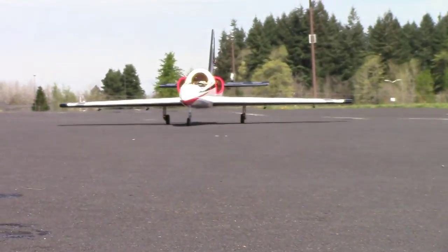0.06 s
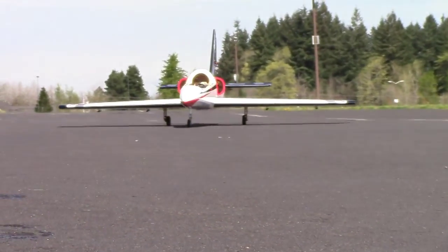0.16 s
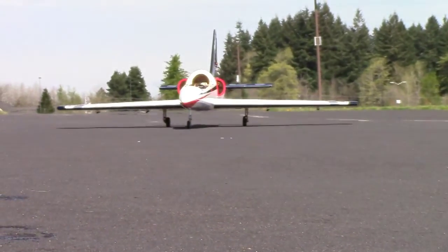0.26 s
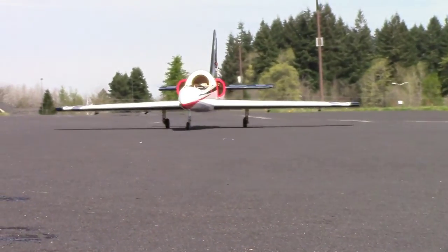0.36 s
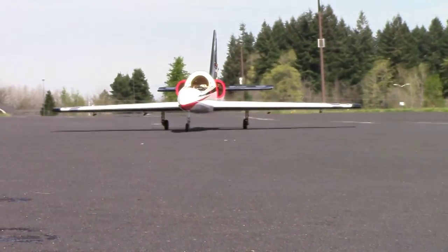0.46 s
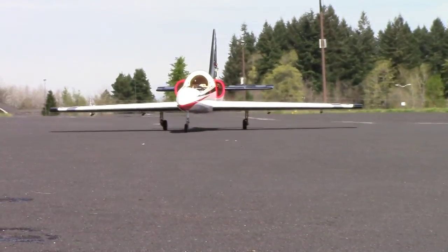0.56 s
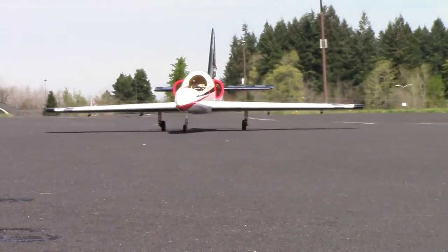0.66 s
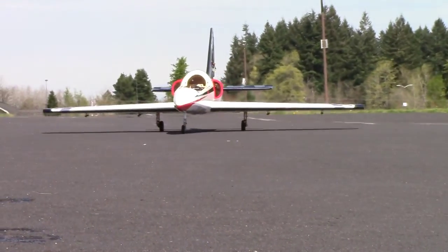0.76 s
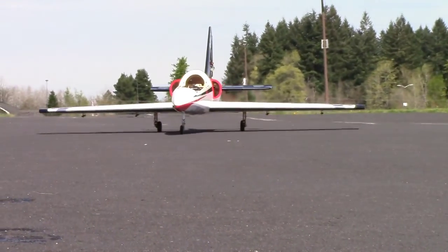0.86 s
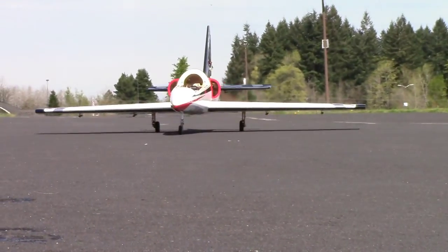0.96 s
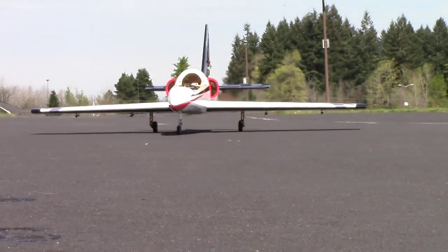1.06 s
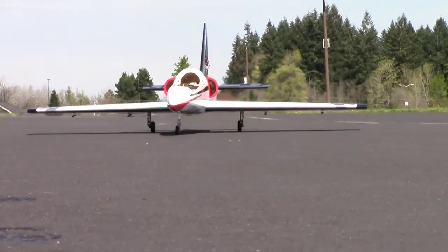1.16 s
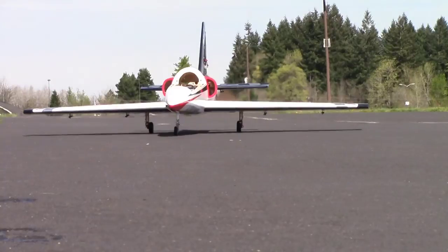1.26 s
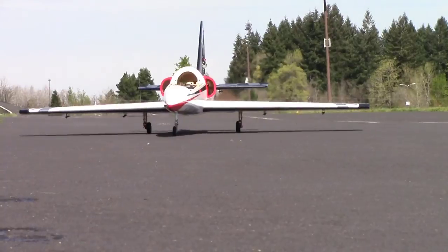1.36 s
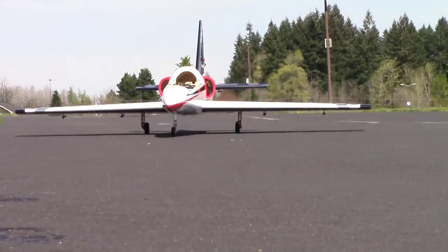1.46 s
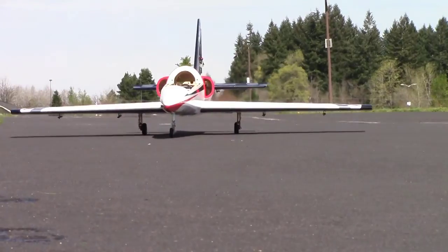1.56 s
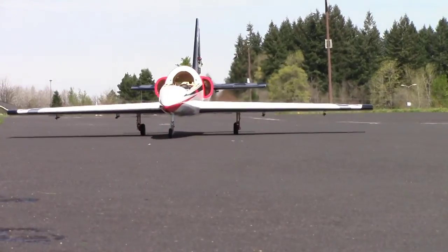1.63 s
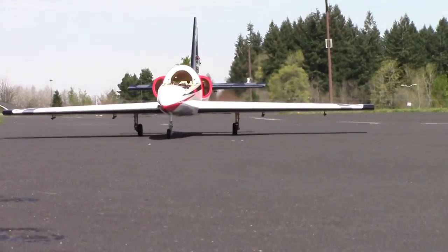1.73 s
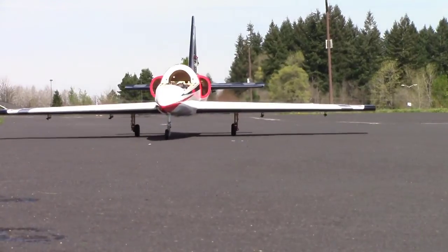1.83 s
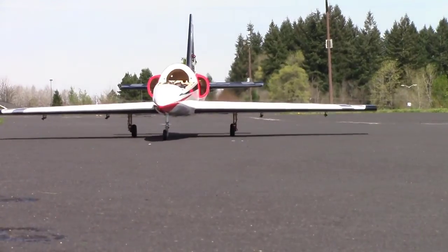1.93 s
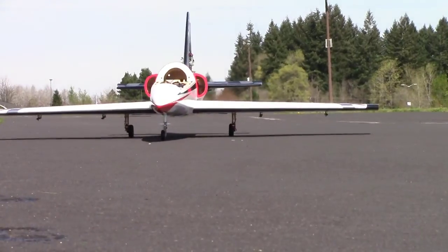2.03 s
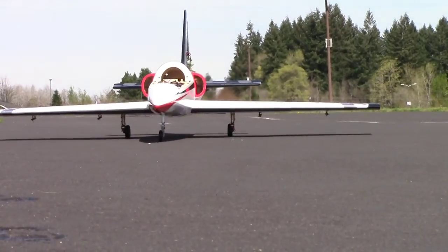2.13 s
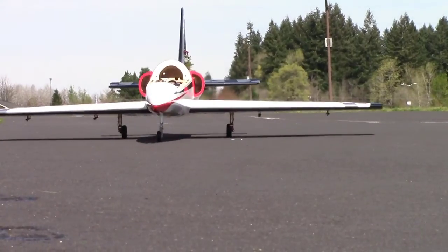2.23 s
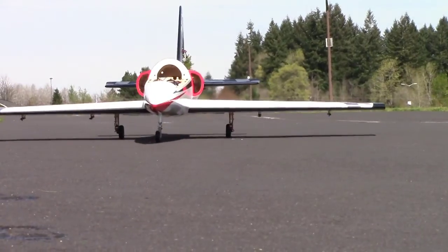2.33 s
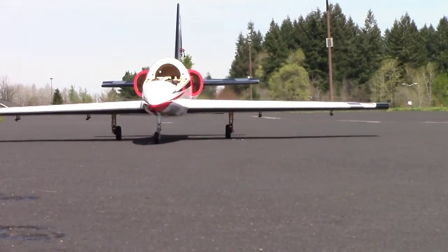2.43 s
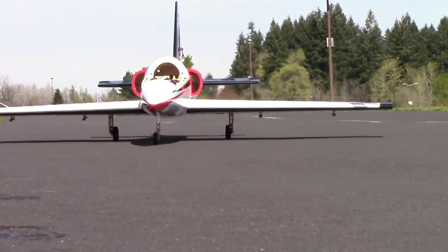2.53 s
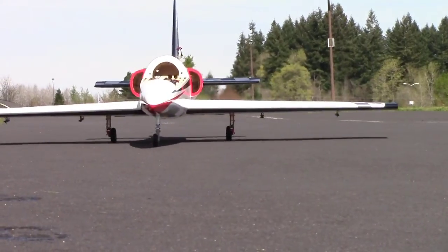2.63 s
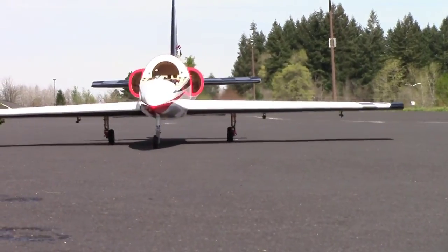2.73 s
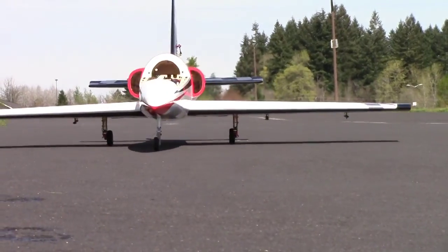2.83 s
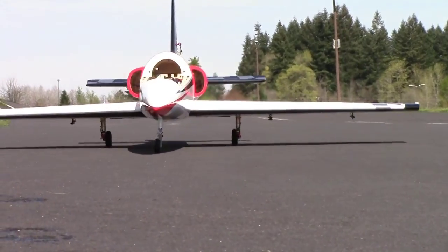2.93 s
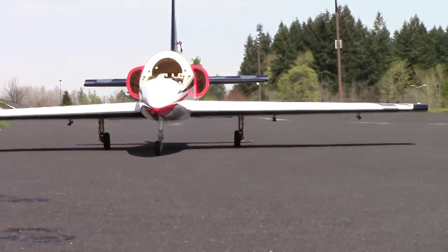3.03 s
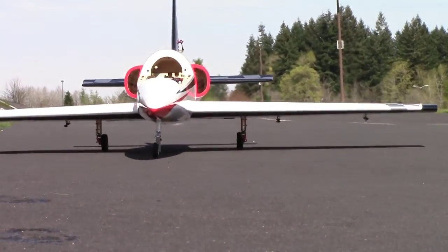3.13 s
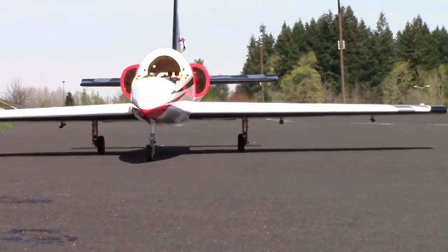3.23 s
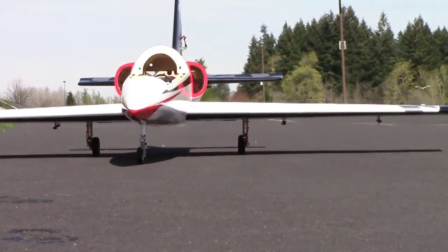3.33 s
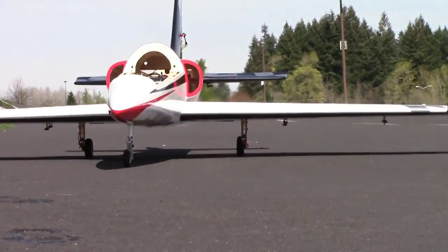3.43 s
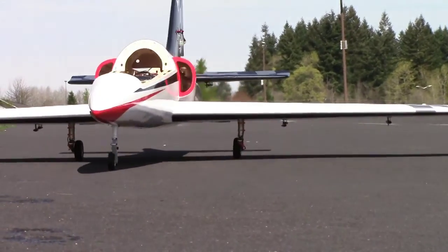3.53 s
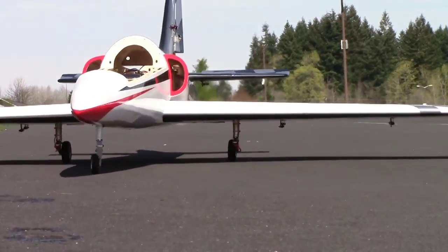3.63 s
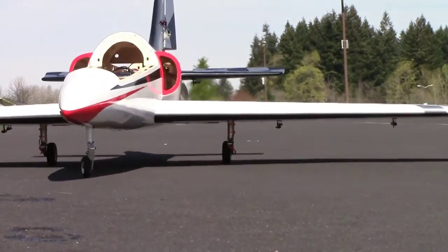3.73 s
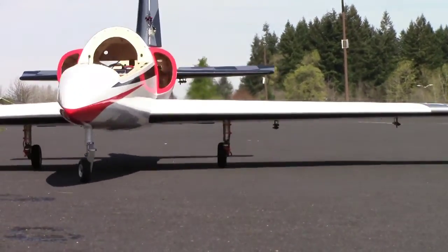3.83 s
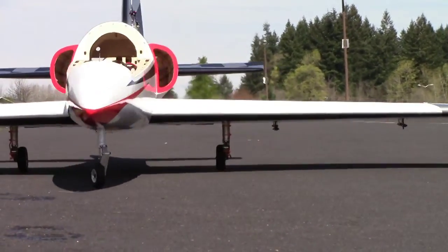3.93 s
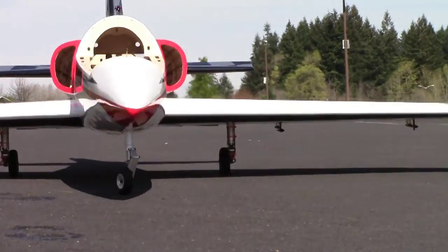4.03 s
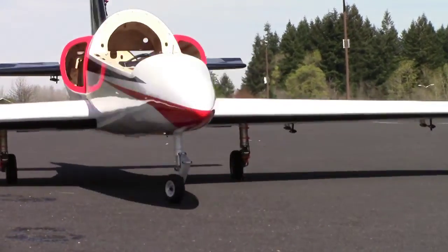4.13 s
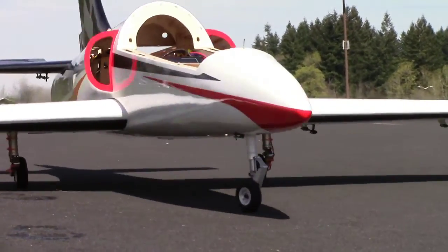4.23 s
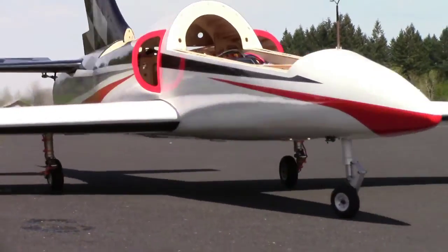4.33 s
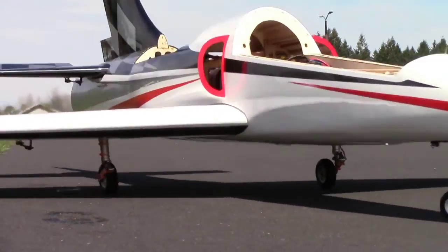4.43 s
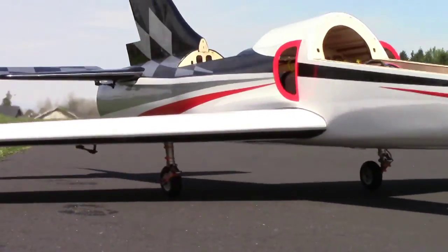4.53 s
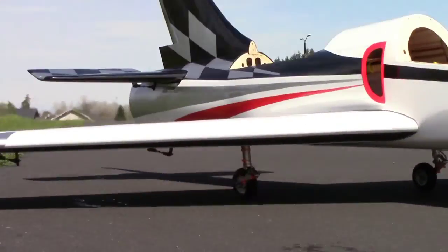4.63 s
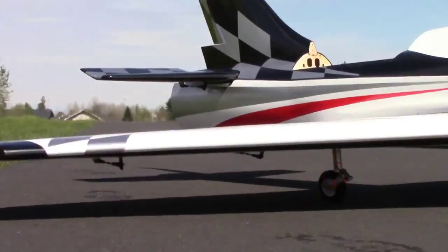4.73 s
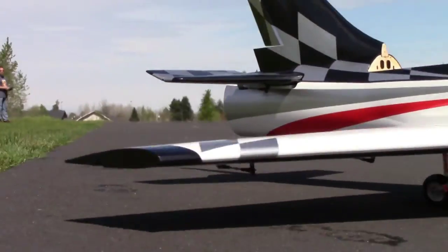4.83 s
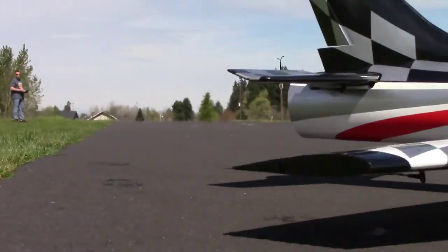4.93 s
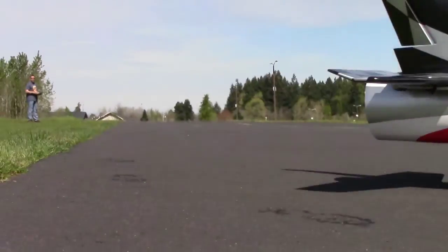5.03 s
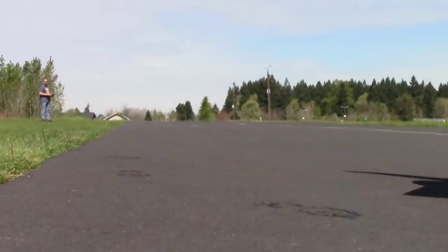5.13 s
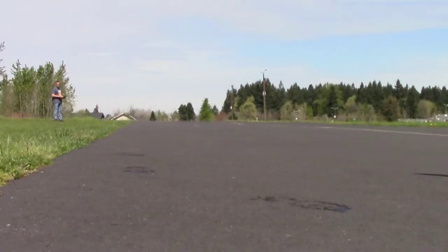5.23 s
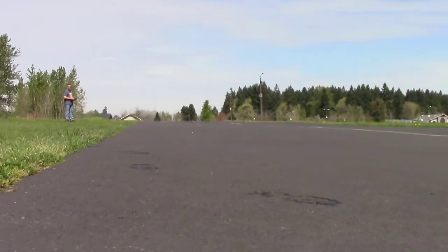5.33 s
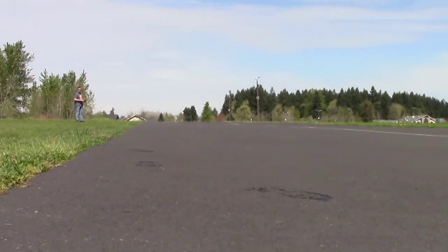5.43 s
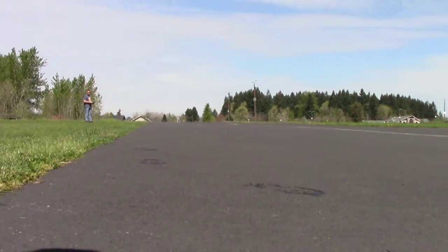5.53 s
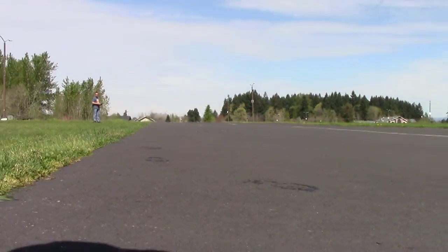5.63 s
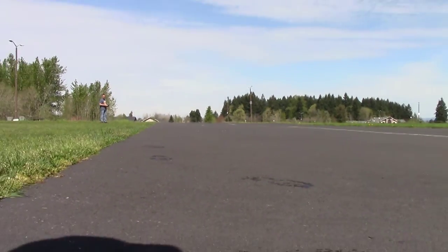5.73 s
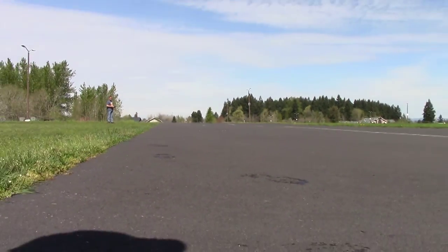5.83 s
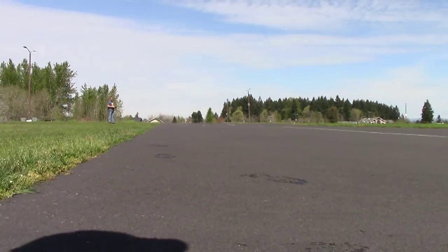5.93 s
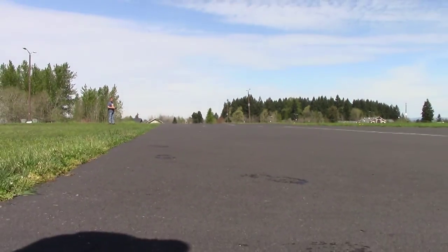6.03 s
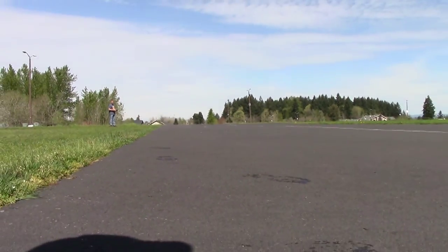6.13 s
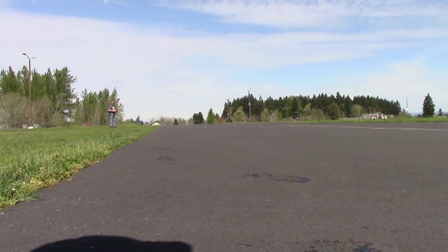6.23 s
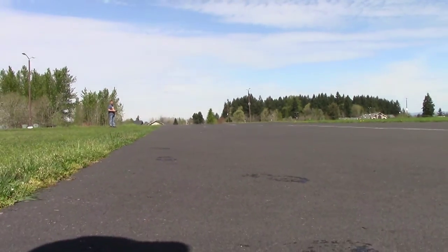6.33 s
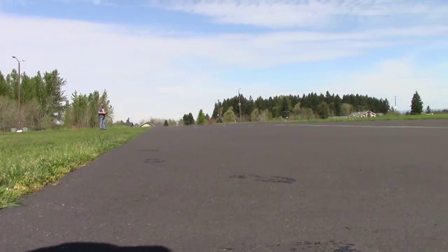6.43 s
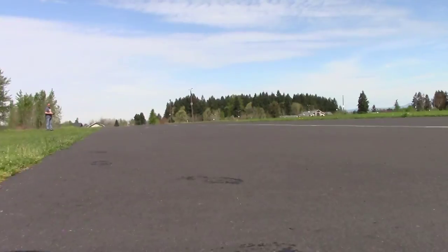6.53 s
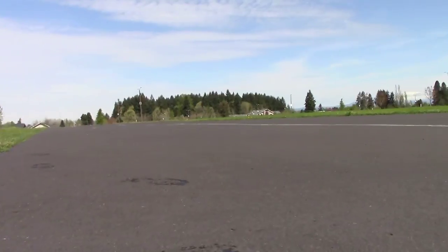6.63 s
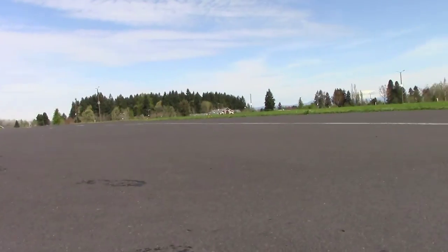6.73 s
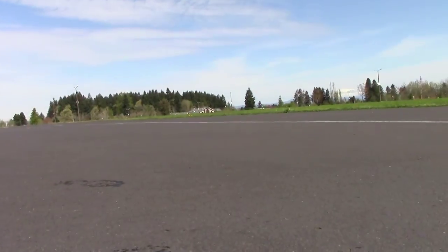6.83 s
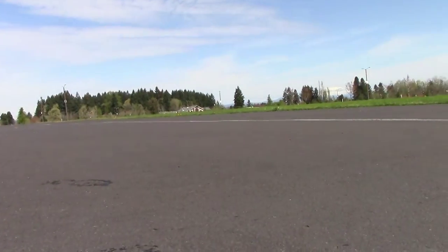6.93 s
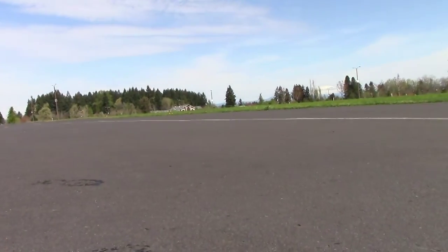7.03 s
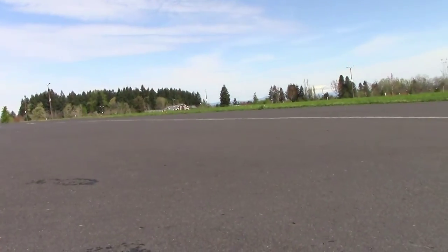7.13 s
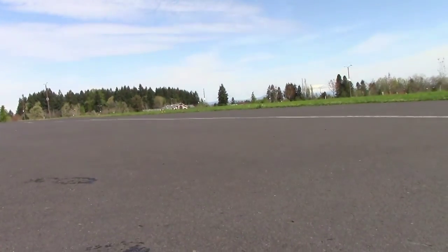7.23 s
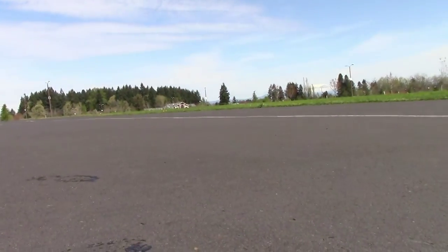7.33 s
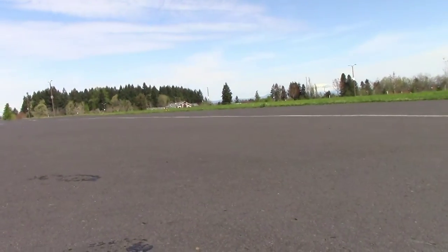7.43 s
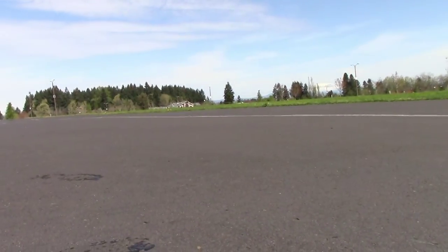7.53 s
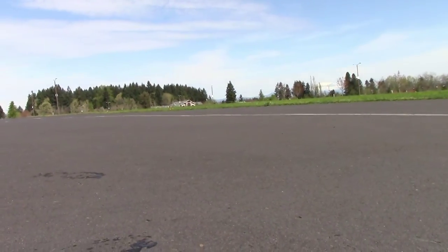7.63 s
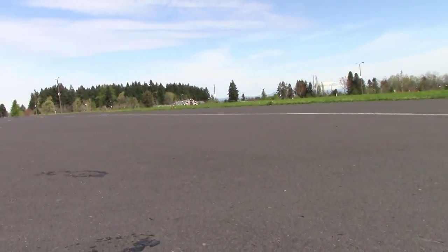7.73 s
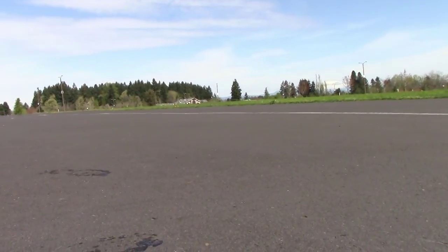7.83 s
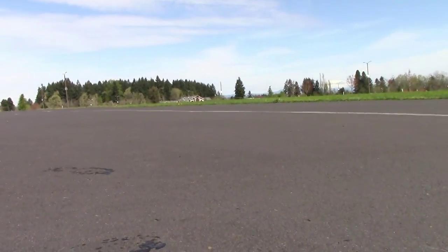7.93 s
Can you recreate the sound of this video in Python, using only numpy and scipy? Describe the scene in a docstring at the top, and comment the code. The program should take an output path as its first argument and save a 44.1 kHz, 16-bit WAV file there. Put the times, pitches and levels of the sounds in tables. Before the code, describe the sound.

Shrill turbine whine climbs and flares over a hissing roar, passes close by, turns to hollow exhaust rumble, and falls in pitch.

```python
"""The small turbine engine of a model jet spools up from idle, holds, and winds down as the jet taxis up,
passes close by and rolls away with its tail to the listener. Tones locked to the shaft make the blade whistle;
shaped noise makes the roar of the gas. The nose gives a ringing intake duct and its hiss,
the rear gives the tailpipe and the jet. A faint low hum lies underneath, and two close microphones hear it all."""
import sys
import numpy as np
from scipy import signal
from scipy.io import wavfile
from scipy.ndimage import uniform_filter1d, minimum_filter1d

SR = 44100
rng = np.random.default_rng(int(sys.argv[2]) if len(sys.argv) > 2 else 0)


def put_to_file(sound):
    """Save the sound as 16-bit audio at rate SR, in the file named by the first command-line argument."""
    columns = np.atleast_2d(sound).T  # one column per channel
    safe = np.clip(columns, -1, 1)
    whole_steps = np.round(safe * 32767)
    wavfile.write(sys.argv[1], SR, whole_steps.astype(np.int16))


N = 351477
FRAME, HOP = 2048, 256  # spectral frame and step [samples]

# side of the aircraft facing the listener: (time [s], aspect [0 nose, 1 flank, 2 tail; held at 2 beyond])
ASPECT = [(0, 0.042), (4.1, 0), (4.5, 0.11), (4.85, 0.78), (5.15, 0.91), (5.6, 0.95), (6.1, 1.7),
          (6.6, 1.84), (7.3, 2.16), (7.97, 1.95)]


def gain_of(db):
    """Decibels to amplitude gain."""
    return 10 ** (np.asarray(db) / 20)


def follow(rows, t):
    """Every column of a time curve, joined by straight lines, at the times t."""
    times, *columns = np.transpose(rows)
    return np.array([np.interp(t, times, column) for column in columns])


def read(rows, hz):
    """Every column of a spectrum, interpolated along log frequency, at the frequencies hz."""
    row_hz, *columns = np.transpose(rows)
    return np.array([np.interp(np.log(hz + 1), np.log(row_hz + 1), column) for column in columns])


def bump(x, centre, width):
    """A bell of height 1, half as high at the ends of its width."""
    return .5 ** ((2 * (x - centre) / width) ** 2)


def wander(rate_hz):
    """Complex noise of power 1 that changes about rate_hz times a second."""
    step = 32  # samples between the slow noise points
    real, imaginary = rng.standard_normal((2, N // step + 2))
    hz = np.fft.fftfreq(len(real), step / SR)
    slow = np.fft.ifft((real + 1j * imaginary) / (1 + (hz / rate_hz) ** 2))
    slow = slow / np.sqrt(np.mean(abs(slow) ** 2))
    return np.interp(np.linspace(0, len(slow) - 1, N), np.arange(len(slow)), slow)


def shaft_speed(t):
    """Turns per second at the times t: inertia bends the heavy rotor's speed into a smooth cubic curve."""
    # throttle up, hold, throttle down: (time [s], shaft speed before waver [turns/s])
    shaft = [(0.0, 624.4), (0.08, 623.1), (1.49, 842.3), (2.09, 937.8), (2.35, 957.2), (2.44, 963.2),
             (3.7, 994.9), (3.8, 994.3), (4.01, 984.0), (4.89, 959.9), (5.25, 953.4), (5.8, 936.4),
             (5.92, 923.5), (6.08, 902.5), (6.58, 788.5), (7.08, 688.6), (7.39, 652.7), (7.97, 606.9)]
    knots, knot_hz = np.transpose(shaft)

    def terms(at):
        """Cubic spline terms plus a straight line."""
        return np.c_[abs(at[:, None] - knots) ** 3, at, np.ones(len(at))]

    # the last two equations keep the ends of the curve straight
    ends = np.c_[[knots, np.ones(len(knots))], np.zeros((2, 2))]
    weights = np.linalg.solve(np.r_[terms(knots), ends], np.r_[knot_hz, 0, 0])
    grid = np.linspace(0, N / SR, N // HOP)
    return np.interp(t, grid, terms(grid) @ weights)


def spool(t):
    """Rotor speed from 0 at its slowest to 1 at full."""
    hz = shaft_speed(t)
    return (hz - hz.min()) / np.ptp(hz)


def whistle_level(t, hz, ahead):
    """The whistle in dB: choked near idle, flaring as its beams sweep by, throbbing during the close pass."""
    # base level as the intakes turn towards the listener and away: (time [s], level [dB])
    whistle_base = [(0.0, -23), (1.37, -8.5), (1.65, -18), (1.91, -20.5), (2.54, -16.0), (2.96, -29),
                    (3.78, -35), (3.9, -20), (4.69, -11.8), (5.11, -33.7), (5.53, -28), (5.64, -48),
                    (6.3, -40), (6.54, -21.5), (7.06, -15.5), (7.29, -32.5), (7.65, -18.5), (7.97, -31)]
    # steering swings a narrow beam over the listener: (time [s], length [s], lift [dB])
    flares = [(0.967, 0.11, 3.5), (1.76, .1, 6), (2.202, .17, 5.5), (3.46, .25, 7.5), (4.16, 0.14, 8),
              (6.784, 0.074, 11.5)]
    flare_db = sum(lift_db * bump(t, s, length) for s, length, lift_db in flares)

    # a whistle this low cannot travel along the duct
    cut_on_hz, cut_on_width_hz = 7610, 23
    choke_ahead_db, choke_behind_db = -26, -7
    choke_db = choke_behind_db + (choke_ahead_db - choke_behind_db) * ahead
    choked = .5 - .5 * np.tanh(.5 * (hz - cut_on_hz) / cut_on_width_hz)

    # the two intakes interfere evenly during the close pass
    pass_s, pass_length_s = 4.47, 0.45
    throb_peak_s, throb_period_s, throb_depth = 4.63, 0.188, 0.78
    far_intake = throb_depth * bump(t, pass_s, pass_length_s)
    throb = abs(1 + far_intake * np.exp(2j * np.pi * (t - throb_peak_s) / throb_period_s))
    return follow(whistle_base, t)[0] + choke_db * choked + flare_db + 20 * np.log10(throb)


def rotor():
    """Tones locked to the shaft; turbulent air makes them flutter and gives each a breathy skirt."""
    # hot exhaust between engine and listener scatters the tones: (time [s], scattered share [0-1])
    scatter_curve = [(0, 0.02), (4.3, .004), (4.7, 0.02), (4.95, 0.6), (5.3, 0.7), (6.3, 0.5), (6.6, 0.42),
                     (6.8, 0.07), (7.97, 0.02)]
    # rotor unbalance, about once a turn: (time [s], level [dB])
    unbalance = [(0, -52), (4.2, -46), (4.6, -27.5), (5.1, -25), (5.5, -29), (6.3, -33), (6.8, -33),
                 (7.1, -35), (7.35, -25), (7.97, -29)]
    # weak orders from unequal blades: (multiple of the shaft, level at idle [dB], level at full speed [dB])
    orders = [(13, -48, -63), (14, -40, -68), (15, -49, -72)]
    # alternating long and short blades, an octave below the whistle: (time [s], level [dB])
    half_tone = [(0.0, -51), (0.32, -49.2), (0.46, -33), (0.95, -45.4), (2.03, -47.5), (3.9, -31),
                 (4.33, -55), (5.09, -34), (5.94, -52), (7.04, -35.1), (7.21, -52), (7.31, -34),
                 (7.97, -54.1)]
    # and a fifth above it: (frequency [Hz], level from ahead [dB], level from behind [dB])
    fifth_tone = [(11200, -43, -43), (12300, -44, -45), (13300, -35, -47), (14800, -39, -50),
                  (15700, -43, -66)]
    blades = 12
    waver_hz, waver_rate_hz = 0.29, 14  # unsteadiness of the shaft speed
    flutter_hz, skirt_hz, skirt_db = 30, 220, -31
    fading, low_fading = 0.06, 0.045  # extra scattered share of weak tones, share of the unbalance

    t = np.arange(N) / SR
    shaft_hz = shaft_speed(t) + waver_hz * wander(waver_rate_hz).real
    angle = 2 * np.pi * np.cumsum(shaft_hz) / SR
    scatter, speed = follow(scatter_curve, t)[0], spool(t)
    weak_share = scatter + fading
    ahead = np.clip(1 - follow(ASPECT, t)[0], 0, 1)

    def tone(order, db, share):
        """One shaft order, part direct and part scattered, silent above half the sample rate."""
        scattered = np.sqrt(share) * wander(flutter_hz)
        air = np.sqrt(1 - share) + scattered + gain_of(skirt_db) * wander(skirt_hz)
        wave = (air * np.exp(1j * order * angle)).real
        return np.sqrt(2) * gain_of(db) * wave * (order * shaft_hz < SR / 2)

    whistle = tone(blades, whistle_level(t, blades * shaft_hz, ahead), scatter)
    whistle = whistle + tone(2 * blades, -48, weak_share)  # faint octave

    fifth = blades + blades / 2
    front_db, back_db = read(fifth_tone, fifth * shaft_hz)
    splitter = tone(blades / 2, follow(half_tone, t)[0], weak_share)
    splitter = splitter + tone(fifth, back_db + (front_db - back_db) * ahead, weak_share)

    buzz = sum(tone(round(order), idle_db + (full_db - idle_db) * speed, weak_share)
               for order, idle_db, full_db in orders)
    shake = tone(0.99, follow(unbalance, t)[0], low_fading)
    # the weak orders leave by the intake only
    return whistle + splitter + ahead * buzz + shake


def gas_colour(t, hz):
    """Spectrum in dB over time: duct resonances from the nose give way to tailpipe resonances from behind."""
    # broad relative colour: (frequency [Hz], nose [dB], flank [dB], tail [dB])
    colour = [(25, -42, -42, -38), (51, -42, -49, -49), (102, -17.5, -14.5, -5), (161, -4.5, -0.5, 2.5),
              (311, -7.5, 0, -13.5), (570, -7.5, 7.5, -7), (1190, -2.5, -4, -10), (2400, -3, -5.5, -13),
              (3270, -11, -6.5, -15), (4920, -17.5, -23, -22), (7070, -16.5, -10.5, -22.5),
              (10500, -10, -20, -22), (12300, -11, -46, -43), (15600, -27, -46, -52)]
    # resonances of intake duct and hollow fuselage: (frequency [Hz], width [Hz], lift or dip [dB])
    duct_modes = [(191, 56, 6), (277, 82, 4.5), (519, 95, 13.5), (634.5, 151, 13.5), (796, 52, -5),
                  (1026, 235, 12), (1278, 91, -5.5), (1400, 197, 9), (1692, 140, 6), (2046, 210, 6.5),
                  (2266, 180, 3), (2520, 120, 0), (2870, 110, 3), (3300, 560, 8), (3860, 230, 4),
                  (6500, 500, 4)]
    # tailpipe resonances: (frequency [Hz], width [Hz], lift from the flank [dB], lift from the tail [dB])
    tailpipe = [(208.5, 67, 9.5, 8), (408, 120, 9, 13), (643, 85, 4, -5), (722, 80, 1.5, 8),
                (1007, 116, 6.5, 3), (1310, 130, 4.5, 3), (1530, 76, -3.5, -3), (1817, 240, -0.5, 4.5),
                (2210, 300, 2.5, -1.5), (2800, 520, 0.5, -2), (3300, 330, 0, -8.5), (3900, 400, 0.5, -0.5)]
    # air sucked through the compressor:
    # (frequency [Hz], width [Hz], lift at idle [dB], lift at full speed [dB])
    suction_band = (8980, 2740, 9.9, 17)
    # breathy intake band that rises with the airflow:
    # (frequency at idle [Hz], frequency at full speed [Hz], width [Hz], lift [dB])
    whoosh_band = (1690, 2350, 250, 4.6)
    # extra fuel while spooling up makes the burner boom: (time [s], lift [dB])
    boom = [(0, 2), (.3, 10), (.8, 14), (1.35, 11.5), (1.55, 4), (2.2, 0.5), (7.97, -20)]
    # burner resonances: (frequency [Hz], width [Hz], share of the boom's lift)
    burner_modes = [(610, 450, 0.42), (989, 306, 0.77), (1320, 110, 0.091), (1535, 380, 0.27)]
    # hot gas bends treble off the jet's axis, moving its brightest pitch:
    # (time [s], frequency [Hz], lift or dip [dB])
    jet_peak = [(5.2, 2500, -21), (5.55, 2960, -3.5), (5.72, 2750, 1), (5.85, 1280, 7), (6.3, 915, 3),
                (6.6, 750, -2), (7.0, 750, -3)]
    jet_width = 0.89  # share of the jet's peak frequency

    speed = spool(t)
    nose, flank, tail = read(colour, hz)
    duct = sum(lift_db * bump(hz, f, width) for f, width, lift_db in duct_modes)
    burner = sum(share * bump(hz, f, width) for f, width, share in burner_modes)
    pipe_flank, pipe_tail = sum(np.outer(dbs, bump(hz, f, width)) for f, width, *dbs in tailpipe)

    suction_hz, suction_width, idle_db, full_db = suction_band
    suction = np.outer(idle_db + (full_db - idle_db) * speed, bump(hz, suction_hz, suction_width))
    idle_hz, full_hz, whoosh_width, whoosh_db = whoosh_band
    whoosh = whoosh_db * bump(hz, idle_hz + (full_hz - idle_hz) * speed[:, None], whoosh_width)

    from_nose = nose + duct + suction + whoosh + np.outer(follow(boom, t)[0], burner)
    views = [from_nose, flank + pipe_flank, tail + pipe_tail]
    aspect = np.clip(follow(ASPECT, t)[0], 0, 2)[:, None]
    # crossfade the power of neighbouring views
    power = sum(np.maximum(1 - abs(aspect - k), 0) * gain_of(view) ** 2 for k, view in enumerate(views))
    jet_hz, jet_db = follow(jet_peak, t)[:, :, None]
    return 10 * np.log10(power) + jet_db * bump(hz, jet_hz, jet_width * jet_hz)


def ripple(t, hz):
    """Fine structure in dB: the wing reflection's comb and the crowded upper modes of the ducts."""
    # a strong reflection close by combs the roar: (time [s], comb spacing [Hz], strength [0-1])
    bounce = [(4.25, 610, 0.03), (4.65, 587, 0.23), (4.8, 580, 0.45), (5.0, 476, 0.22), (5.3, 436, 0),
              (5.6, 430, 0.03)]
    modes_db, modes_from_hz = 2.17, 1800
    spacing_hz, strength = follow(bounce, t)[:, :, None]
    comb = abs(1 + strength * np.exp(2j * np.pi * hz / spacing_hz))
    modes = uniform_filter1d(rng.standard_normal(len(hz)), size=6)
    return 20 * np.log10(comb) + modes_db * modes / modes.std() * (hz > modes_from_hz)


def gas():
    """Turbulent flow through duct and pipe: noise whose eddies of four sizes each have their own strength."""
    # target levels: (time [s], rumble of large eddies [dB], combustion roar [dB],
    # jet mixing rush [dB], fine hiss [dB])
    gas_levels = [(0.0, -31, -20.5, -26.4, -34), (0.3, -28.6, -14, -22, -25.0),
                  (0.68, -25, -11.5, -20.5, -25), (1.01, -27.5, -15.0, -23.5, -28.5),
                  (1.39, -31, -17.5, -24.5, -26.0), (1.51, -37, -25, -29.5, -31.5),
                  (2.03, -36.5, -24.5, -26, -29), (2.27, -45.5, -29.5, -29, -25),
                  (4.21, -33, -19.5, -17.5, -20), (4.69, -27, -21, -20, -20),
                  (4.83, -26.5, -16, -21.5, -21.1), (5.25, -16.5, -15.5, -18.5, -28),
                  (5.53, -21, -13.5, -13.5, -21.5), (5.7, -25, -15.5, -18, -34.5),
                  (6.32, -24.5, -19.1, -31, -40.5), (6.76, -20, -20.5, -23.5, -30),
                  (6.86, -25, -20.5, -25, -33.5), (7.97, -23, -16.5, -16.5, -28.5)]
    # limits of those four bands [Hz]
    edges = np.array([70, 320, 1250, 4000, 15000])
    patchy_db = 1.0  # spread of the random patches in time and pitch

    t, hz = np.arange(N // HOP + 2) * HOP / SR, np.fft.rfftfreq(FRAME, 1 / SR)
    real, imaginary, patches = rng.standard_normal((3, len(t), len(hz)))
    patches = uniform_filter1d(uniform_filter1d(patches, size=12, axis=0), size=24, axis=1)
    size = gain_of(gas_colour(t, hz) + ripple(t, hz) + patchy_db * patches / patches.std())

    low, high = edges[:-1], edges[1:]
    inside = (hz[:, None] >= low) & (hz[:, None] < high)
    blend = read(np.c_[np.sqrt(low * high), np.eye(len(low))], hz)
    target_db = follow(gas_levels, t).T
    # repeated corrections tilt the spectrum smoothly, leaving its resonances in place
    for _ in range(len(low)):
        band_db = 10 * np.log10(size ** 2 @ inside)
        size = size * gain_of((target_db - band_db) @ blend)

    spectrum = ((real + 1j * imaginary) * size).T
    sound = signal.istft(spectrum, nperseg=FRAME, noverlap=FRAME - HOP)[1][:N]
    # overlapping independent frames partly cancel: restore their power
    return np.sqrt(3 * FRAME / HOP / 8) * sound


def hum(hz=88, width_hz=7):
    """A faint, narrow, wavering band of bass: a low tone multiplied by slow noise."""
    # (time [s], level [dB])
    hum_level = [(0, -44), (.45, -43), (.7, -41), (2, -66), (3.3, -67), (4.5, -72)]
    t = np.arange(N) / SR
    wave = (wander(width_hz) * np.exp(2j * np.pi * hz * t)).real
    return np.sqrt(2) * gain_of(follow(hum_level, t)[0]) * wave


def microphones(sound):
    """Two close ports: the one nearer the aircraft hears the treble louder and a little earlier."""
    # where the aircraft is: (time [s], multiple of the side lead [negative right, positive left])
    bearing = [(0, 0.0011), (1, 0.086), (4.1, 0.053), (4.6, 0.03), (5.1, -0.29), (5.5, -1.1), (5.9, -2.1),
               (6.4, -1.74), (7, -1.16), (7.97, -1)]
    # lead of the nearer port for a sound from the side: (frequency [Hz], level [dB], phase [rad])
    port_lead = [(247, 0, 0.0069), (700, 0, 0.088), (1300, 0, 0.13), (2400, 1, 0.12), (3800, 0.2, 0.19),
                 (5200, 3, 0.41), (7550, 2.5, 0.19), (11300, 3.5, 1), (15000, 1, 0.98)]
    hz, t, spectrum = signal.stft(sound, SR, nperseg=FRAME)
    lead_db, lead_angle = read(port_lead, hz)[:, :, None] * follow(bearing, t)[0]
    # half the lead goes to one port, its inverse to the other
    half = gain_of(lead_db / 2) * np.exp(.5j * lead_angle)
    pair = np.array([half, 1 / half]) * 2 / abs(half + 1 / half)
    return signal.istft(pair * spectrum, nperseg=FRAME)[1][:, :N]


def scene():
    """One engine in the open air, over a faint hum."""
    return microphones(rotor() + gas() + hum())


def record(dry):
    """A limiter eases the gain down around the highest peaks; then a steep low-pass removes the top treble."""
    ceiling, span, edge_hz = .93, 129, 15720  # full scale 1, samples, Hz
    allowed = 1 / np.maximum(abs(dry).max(0) / ceiling, 1)
    gain = uniform_filter1d(minimum_filter1d(allowed, size=span), size=span)
    low_pass = signal.firwin(801, edge_hz, window=("kaiser", 9), fs=SR)
    return signal.oaconvolve(dry * gain, low_pass[None], "same")


dry = scene()
out = record(dry)
put_to_file(out)
```